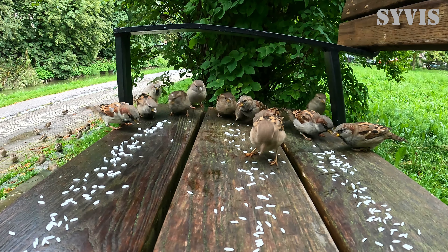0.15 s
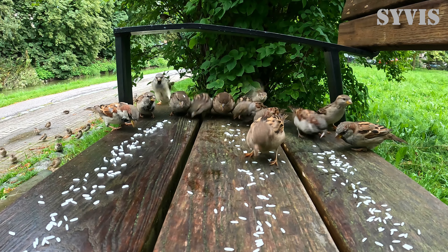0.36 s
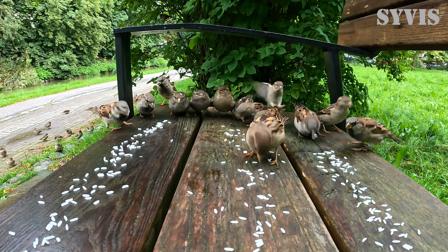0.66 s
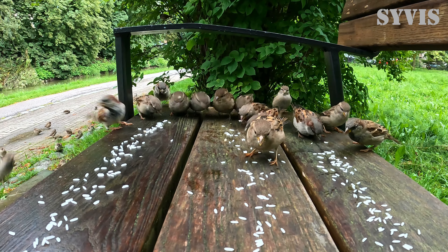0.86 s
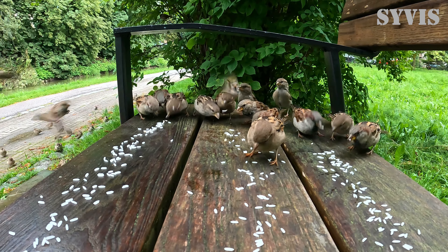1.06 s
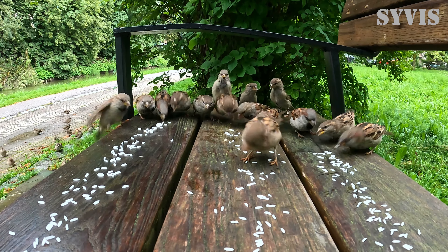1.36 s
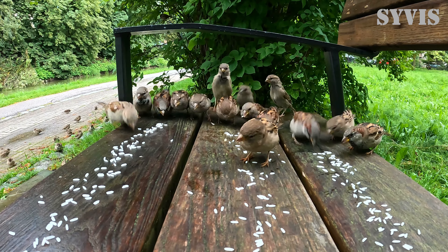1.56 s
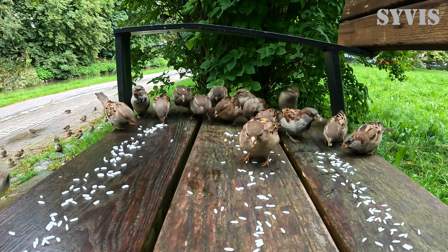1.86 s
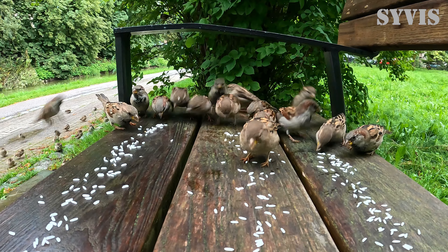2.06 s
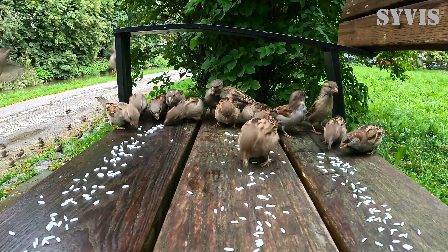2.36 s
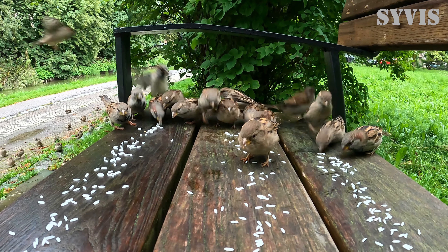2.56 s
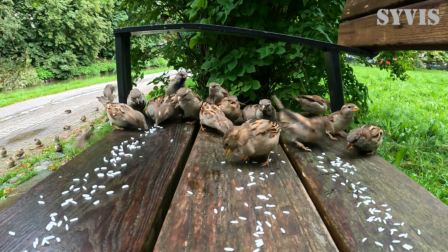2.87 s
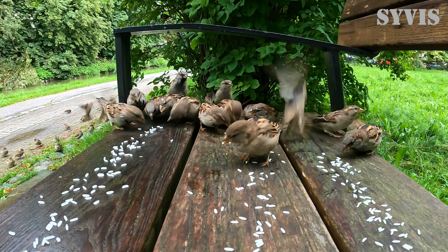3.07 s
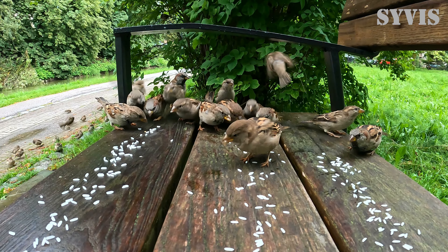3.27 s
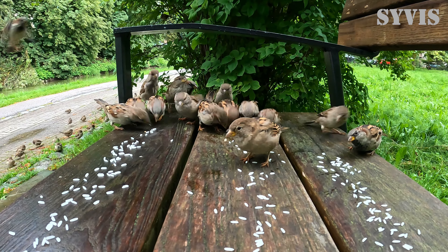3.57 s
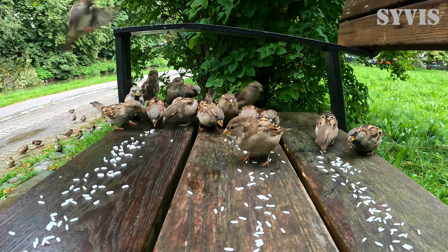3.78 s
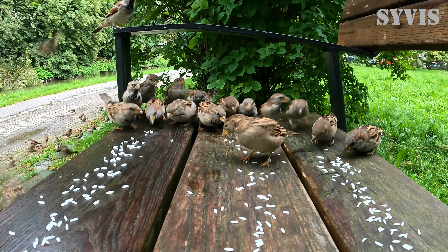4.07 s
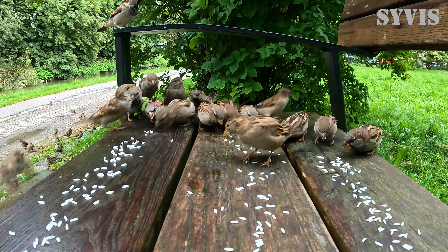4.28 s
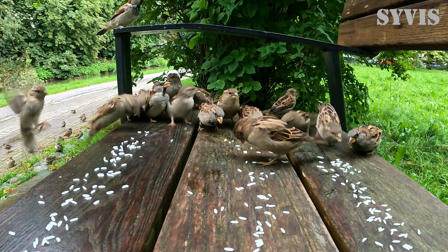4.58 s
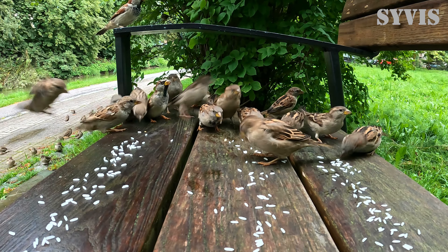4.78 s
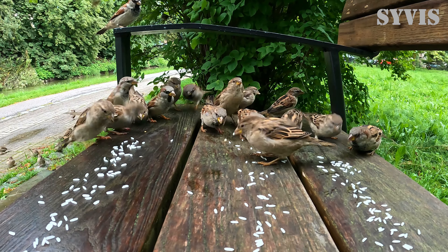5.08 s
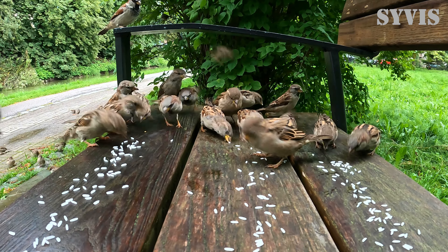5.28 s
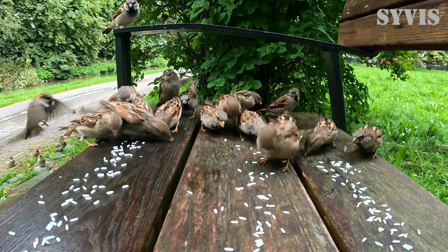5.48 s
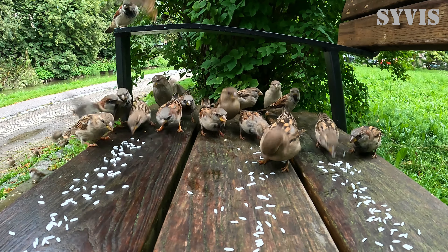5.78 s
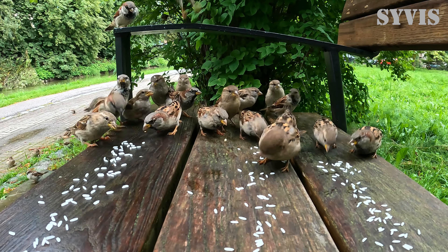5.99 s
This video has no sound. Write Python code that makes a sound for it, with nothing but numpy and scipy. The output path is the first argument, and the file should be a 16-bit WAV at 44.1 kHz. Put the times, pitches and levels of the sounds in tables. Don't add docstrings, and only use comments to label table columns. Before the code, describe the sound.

Sparrows cheep in short raspy bursts and peck at grain on a wooden table, over a loud low rumble of distant traffic.

```python
import sys
import numpy as np
from scipy import signal
from scipy.fft import rfft, irfft
from scipy.io import wavfile
from scipy.ndimage import uniform_filter1d

SR = 44100
rng = np.random.default_rng(int(sys.argv[2]) if len(sys.argv) > 2 else 0)


def unload_audio(sound):
    columns = np.transpose(np.atleast_2d(sound))
    steps = np.round(np.clip(columns, -1, 1) * 32767)
    wavfile.write(sys.argv[1], SR, steps.astype(np.int16))


def volts_from_decibels(level):
    exponent = np.asarray(level, float) / 20
    return 10 ** exponent


N = 270637


def band(x, lo_hz, hi_hz, order=2):
    return signal.sosfilt(signal.butter(order, [lo_hz, hi_hz], "band", fs=SR, output="sos"), x)


def walk(rate):
    hold = int(SR / rate)
    steps = np.repeat(rng.standard_normal(N // hold + 1), hold)
    return 1.306 * uniform_filter1d(uniform_filter1d(steps, hold), hold)[:N]


def curves(table):
    s, *columns = np.transpose(table)
    return [np.interp(np.arange(N) / SR, s, column) for column in columns]


def add(out, t, sound, pan_db):
    first = int(t * SR)
    sound = sound[:N - first].T
    out[:, first:first + sound.shape[-1]] += sound * volts_from_decibels(np.array([[pan_db], [-pan_db]]) / 2)


def chirps():
    # start in seconds, length in seconds, first pitch in Hz, last pitch in Hz, level in dB.
    reedy_notes = [(0.158, 0.043, 4800, 4420, -47.5), (0.194, .035, 4150, 3750, -53),
                   (1.348, .009, 5500, 4750, -32), (1.353, 0.014, 4720, 4920, -23),
                   (1.367, 0.02, 4780, 4330, -35), (1.385, 0.016, 4030, 3680, -39.5),
                   (2.509, 0.03, 4650, 4050, -50), (2.599, 0.024, 4300, 3550, -56),
                   (2.537, 0.018, 3920, 3550, -42), (2.551, 0.0403, 3510, 3090, -43),
                   (2.59, .045, 3050, 2200, -44.5)]
    left_notes = [(.386, 0.059, 5060, 3940, -44.5), (.386, 0.016, 4450, 4130, -49),
                  (.404, .018, 4350, 3930, -42), (.425, .02, 2900, 2600, -61),
                  (.865, 0.02, 2740, 3170, -45.5), (.887, 0.026, 3250, 2830, -44),
                  (.915, 0.013, 3160, 2700, -48), (2.89, .04, 4790, 4070, -45),
                  (2.937, 0.038, 3850, 3200, -42), (2.941, .045, 3500, 2730, -52),
                  (3.643, .017, 6300, 5300, -46.5), (3.658, 0.034, 5200, 4660, -35),
                  (3.693, 0.033, 4710, 3720, -37.5), (3.725, 0.0081, 3800, 3300, -41),
                  (3.732, 0.0078, 3300, 2480, -43), (3.744, 0.01, 3400, 2580, -48),
                  (.88, .03, 3700, 3330, -57), (3.92, 0.049, 5800, 4266, -52.5),
                  (4.856, 0.04, 4660, 4210, -39.5), (4.893, 0.017, 4700, 4200, -38),
                  (5.127, 0.021, 5300, 5410, -47), (5.5, 0.014, 3940, 3895, -56),
                  (5.512, 0.0095, 2890, 2560, -41.5), (5.515, 0.0083, 3360, 3200, -48),
                  (5.965, .025, 6090, 5706, -54), (5.775, 0.0173, 5350, 4680, -41),
                  (5.79, 0.044, 4610, 4250, -41.5)]
    right_notes = [(.305, 0.023, 5800, 5200, -51.5), (1.066, .014, 7300, 7000, -54),
                   (1.073, .008, 6950, 6800, -56), (1.082, 0.022, 5470, 4500, -52),
                   (1.112, .018, 4200, 3700, -48.5), (1.297, 0.024, 8100, 5900, -49),
                   (1.338, .008, 8900, 8300, -48), (1.373, .008, 6900, 6600, -49),
                   (1.31, .02, 12050, 13000, -59), (1.3, 0.015, 10200, 10200, -55),
                   (1.295, 0.024, 5300, 6800, -50), (1.316, 0.02, 6100, 6250, -43),
                   (1.817, .004, 4600, 4950, -42), (1.5, 0.0089, 5150, 5250, -52),
                   (1.829, .015, 5000, 4150, -46), (1.848, 0.027, 3950, 4800, -46),
                   (1.843, 0.015, 5500, 5260, -42), (1.87, 0.0227, 4300, 3500, -44),
                   (1.892, 0.015, 3400, 2750, -45.5), (3.768, .03, 5900, 4630, -45.5),
                   (3.735, .005, 5400, 4300, -43), (3.743, .005, 4900, 4100, -46),
                   (3.75, 0.0043, 4700, 3600, -46), (3.769, 0.0082, 3400, 5000, -40),
                   (4.2, 0.03, 3660, 4700, -48), (5.815, 0.036, 4370, 3300, -47)]
    clear_notes = [(4.848, 0.0099, 5980, 4900, -36.5), (4.858, 0.04, 4970, 4760, -34.5),
                   (1.323, 0.0078, 8800, 7900, -42), (1.332, 0.015, 7850, 7100, -39),
                   (4.893, 0.027, 4250, 3810, -33.5), (4.92, 0.023, 3850, 3470, -39.5),
                   (5.147, 0.034, 5250, 4300, -38), (5.175, 0.026, 4180, 3580, -44),
                   (5.203, 0.035, 3500, 2960, -45), (5.243, .018, 2950, 2700, -55),
                   (5.178, 0.022, 4550, 3920, -43), (5.205, 0.035, 3970, 3510, -47),
                   (.326, 0.037, 4870, 4100, -60), (.347, 0.017, 4400, 3830, -48),
                   (.36, 0.05, 3900, 3230, -44.5), (.362, .03, 3600, 3300, -53),
                   (.403, 0.033, 3250, 3070, -49.5), (1.859, 0.015, 4750, 4290, -39),
                   (1.874, 0.018, 4350, 3600, -40.5), (5.992, 0.058, 5470, 3650, -47.5)]
    # octave overtone in dB, left minus right in dB, rasp of a -30 dB note from 0 to 1.
    voices = [
        (-12, 1, .15),
        (-26, 1, .28),
        (-26, -3, .32),
        (-21, 2, .16),
    ]
    out, fade = np.zeros((2, N)), .004
    waver, tremble, broken = walk(220), walk(300), walk(150)
    spill = band(rng.standard_normal(N), 90, 520)
    spill /= spill.std()
    groups = (reedy_notes, left_notes, right_notes, clear_notes)
    for notes, (octave_db, pan_db, husk) in zip(groups, voices):
        for start, length, hz0, hz1, db in notes:
            t = np.arange(start - fade, start + length + fade, 1 / SR)
            i = (t * SR).astype(int)
            rasp = np.clip(husk + .014 * (-30 - db), .05, .65)
            along = np.clip((t - start) / length, 0, 1)
            glide = hz0 + (hz1 - hz0) * along ** .85
            pitch = glide * (1 + (.004 + .022 * rasp) * waver[i])
            phase = 2 * np.pi * np.cumsum(pitch) / SR
            edge = np.clip(np.minimum(t - t[0], t[-1] - t) / (2 * fade), 0, 1)
            effort_db = np.interp(along, [0, .34, 1], [-1, 0, -2.5])
            third = volts_from_decibels(effort_db - 17) * np.sin(3 * phase)
            overtone_db = octave_db + .3 * effort_db + 4 * broken[i] - 2
            voice = np.sin(phase) + volts_from_decibels(overtone_db) * (np.sin(2 * phase) + third)
            tone = voice * (np.sqrt(1 - rasp ** 2) + rasp * spill[i])
            level = volts_from_decibels(db + effort_db + 2 * tremble[i])
            add(out, t[0], np.sqrt(2) * tone * edge * level, pan_db)
    return out


def tick(width_s, lo_hz, hi_hz):
    t = (np.arange(400) - 130) / SR
    grit = rng.standard_normal(400) * volts_from_decibels(6.4 * np.repeat(rng.standard_normal(20), 20))
    burst = np.exp(-np.abs(t) / (width_s * 1.6 ** rng.uniform(-.86, 1)))
    crack = band(grit * burst, lo_hz, hi_hz, order=3)
    return crack / np.sqrt(2 * uniform_filter1d(crack ** 2, size=40).max())


def pecks():
    # time
    # in seconds, treble in dB, upper middle in dB, middle in dB.
    small_hits = [(0.0141, -37, -39, -32.5), (0.046, -42, -50, -41), (0.1628, -48, -56, -45),
                  (0.2045, -54, -47, -51), (0.3705, -56, -52, -53), (0.5435, -59, -40, -53),
                  (0.684, -37, -39, -30), (0.7122, -53, -65, -48), (0.7628, -48, -54, -49),
                  (0.783, -62, -61, -55), (0.8469, -59, -46, -51), (0.9122, -63, -57, -53),
                  (1.1193, -56, -58, -48), (1.2354, -54, -43, -53), (1.2653, -54, -56, -43),
                  (1.5193, -60, -62, -55), (1.5345, -55, -64, -48), (1.6, -53, -58, -49),
                  (1.7367, -41, -55, -34), (1.9061, -41, -39, -36), (1.9726, -53, -53, -50),
                  (2.0696, -50, -49, -45), (2.1762, -57, -54, -50), (2.3921, -57, -55, -51),
                  (2.51, -54, -49, -53), (2.6519, -58, -58, -53), (2.6748, -51, -48, -48),
                  (2.6859, -44, -51, -42), (2.8959, -59, -57, -53), (2.929, -49, -55, -47),
                  (2.934, -47, -44, -42), (3.0172, -50, -48, -43), (3.034, -44, -47, -37),
                  (3.3246, -48, -52, -37), (3.4404, -56, -60, -50), (4.042, -43, -46, -42.5),
                  (4.1601, -59, -54, -48), (4.2265, -59, -59, -51), (4.349, -56, -46, -48),
                  (4.4129, -56, -56, -41), (4.4569, -53, -48, -35), (4.4751, -38, -44, -35),
                  (4.7267, -48, -48, -35), (4.7816, -49, -62, -37), (4.7912, -48, -45, -45),
                  (5.0682, -60, -65, -53), (5.1363, -42, -39, -40), (5.471, -55, -59, -43),
                  (5.6048, -47, -54, -37), (5.8603, -58, -53, -53),
                  (0.528, -40, -49, -51), (0.5313, -54, -54, -52), (0.5755, -54, -50, -53),
              (0.6556, -47, -43, -53), (0.8058, -43, -46, -42), (1.1778, -49, -41, -53),
              (1.2862, -47, -51, -42), (1.5846, -39, -52, -49), (1.6113, -47, -56, -53),
              (1.805, -45, -49, -48), (1.8732, -41, -46, -53), (1.877, -43, -41, -53),
              (2.015, -52, -56, -51), (2.0762, -52, -55, -53), (2.2524, -51, -43, -50),
              (2.4048, -53, -56, -53), (2.4553, -48, -45, -53), (2.4717, -42, -53, -53),
              (2.7565, -48, -55, -53), (2.7841, -55, -55, -53), (2.8878, -50, -57, -53),
              (2.9991, -48, -55, -48), (3.0494, -55, -64, -53), (3.1156, -52, -53, -53),
              (3.123, -55, -50, -53), (3.3406, -48, -65, -53), (3.4649, -53, -54, -51),
              (3.4883, -42, -49, -40), (3.512, -44, -43, -48), (3.5525, -54, -65, -51),
              (3.7569, -46, -53, -53), (3.81, -50, -65, -53), (3.814, -45, -65, -51),
              (3.862, -45, -50, -50), (3.893, -48, -40, -51), (3.956, -43, -58, -51),
              (4.1079, -48, -58, -53), (4.185, -45, -52, -42), (4.8116, -45, -37, -53),
              (4.9525, -50, -65, -53), (5.0039, -42, -58, -52), (5.1152, -44, -56, -48),
              (5.1673, -43, -46, -53), (5.3553, -43, -56, -37), (5.4275, -54, -65, -56),
              (5.751, -50, -54, -53), (5.8161, -51, -43, -53), (5.8853, -44, -65, -49),
              (6.007, -56, -47, -53), (6.0626, -54, -53, -53),
                  (0.1694, -56, -55, -47), (0.2295, -56, -54, -44), (0.2331, -55, -55, -43),
                 (0.4531, -62, -56, -47), (0.508, -59, -51, -50), (0.6263, -52, -58, -36),
                 (0.7061, -57, -47, -38), (0.73, -37, -42, -27.5), (0.7519, -59, -56, -42),
                 (0.972, -54, -56, -42), (1.095, -62, -53, -52), (1.1281, -49, -59, -42),
                 (1.2543, -46, -52, -31.5), (1.556, -50, -51, -31), (1.6624, -70, -59, -38.5),
                 (1.9524, -57, -51, -42), (2.3079, -54, -65, -46), (2.325, -69, -46, -43),
                 (2.3794, -66, -57, -44), (2.478, -48, -46, -36), (2.707, -46, -43, -37),
                 (2.7107, -46, -50, -33), (2.9147, -58, -42, -38), (3.0587, -66, -53, -53),
                 (3.3129, -55, -52, -47), (3.5427, -63, -47, -51), (4.121, -57, -58, -42),
                 (4.1658, -59, -45, -39), (4.2875, -60, -57, -38), (4.2935, -48, -46, -33.5),
                 (4.3178, -61, -56, -39), (4.379, -55, -63, -37), (4.6023, -57, -44, -34),
                 (4.6418, -54, -50, -31), (4.7574, -52, -48, -38), (4.7617, -35, -37, -20),
                 (4.9211, -39, -32, -27), (5.1406, -66, -45, -53), (5.2719, -56, -57, -47),
                 (5.5196, -61, -55, -35), (5.5557, -46, -44, -33), (5.6762, -52, -42, -38),
                 (5.7072, -50, -65, -37), (5.8049, -48, -42, -34), (6.0311, -49, -38, -34),
                 (6.0696, -54, -49, -42),
                  (4.8835, -60, -56, -35),
        (4.5, -50, -36, -42),
        (4.6, -60, -48, -44),
        (4.7, -47, -42, -44),
    ]
    out, lead = np.zeros((2, N)), 136 / SR
    for t, treble_db, upper_db, mid_db in small_hits:
        shared, own = tick(.0004, 8600, 13800), tick(.0004, 9500, 15000)
        treble = shared + .53 * own * np.array([[1], [-1]])
        pan_db = 4.8 * rng.standard_normal()
        add(out, t - lead, volts_from_decibels(treble_db - 1.5) * treble.T, 2.2)
        add(out, t - lead, volts_from_decibels(upper_db - .8) * tick(.00034, 5500, 8600), pan_db)
        add(out, t - lead, volts_from_decibels(mid_db - 1.5) * tick(.00068, 1800, 5060), pan_db)
    for when, size, colour, side in rng.random((900, 4)):
        db = min(-3 * np.log(size), 6) - 62
        lo_hz = 3000 * 3 ** colour
        add(out, when * (N - 400) / SR, volts_from_decibels(db) * tick(.00043, lo_hz, 1.5 * lo_hz), 22 * (side - .35))
    return out


def knocks():
    # time in seconds, peak in dB, ring pitch in Hz.
    landings = [(0.438, -35, 370), (0.659, -47, 520), (1.143, -34, 438), (1.873, -37, 369.5),
                (2.216, -37, 539), (2.391, -39, 544), (2.738, -39, 444), (2.927, -24, 425),
                (3.121, -34.5, 350), (3.321, -36, 507), (3.836, -35, 509), (4.343, -39, 363),
                (4.723, -36.5, 363.2), (5.126, -26, 506.3), (5.808, -34.5, 420.5)]
    out, t = np.zeros((2, N)), np.arange(4000) / SR
    for when, db, hz in landings:
        main_t60 = min(.085, .08 * (425 / hz) ** 3.55)
        ring = 0
        for ratio, mode_db, t60 in ((1, 3.5, main_t60), (1.45, -8, .047), (2.4, .5, .022)):
            ring = ring + volts_from_decibels(mode_db) * np.sin(2 * np.pi * ratio * hz * t) * 1000 ** (-t / t60)
        add(out, when, volts_from_decibels(db) * ring * (1 - np.exp(-t / .0003)), 0)
    return out


def chatter():
    # start in seconds, end in seconds, first Hz, last Hz, level in dB.
    far_whistles = [
        (.42, .72, 4710, 4620, -60.5),
        (.68, .9, 4680, 4400, -65),
        (.79, .95, 5050, 5000, -62.5),
        (3.21, 3.67, 4470, 4490, -63.5),
    ]
    # start in seconds, end in
    # seconds, centre in Hz, width in Hz, level in dB.
    squabbles = [
        (1.292, 1.37, 7000, 2400, -46),
        (3.73, 3.805, 3800, 3000, -47.5),
        (3.768, 3.826, 1900, 730, -48),
        (5.16, 5.168, 2574, 410, -43),
        (4.56, 4.72, 6800, 6500, -56),
        (0.31, 0.44, 3900, 1400, -58),
        (1.84, 1.9, 4300, 2200, -51),
        (2.911, 2.919, 6800, 1100, -47),
    ]
    out = np.zeros((2, N))
    for start, end, hz0, hz1, db in far_whistles:
        n = int((end - start) * SR)
        pitch = np.linspace(hz0, hz1, n) * (1 + .011 * walk(160)[:n])
        whistle = np.sin(2 * np.pi * np.cumsum(pitch) / SR) * signal.windows.tukey(n, .3)
        add(out, start, np.sqrt(2) * whistle * volts_from_decibels(db + 1 + 2 * walk(160)[:n]), 0)
    for start, end, hz, width_hz, db in squabbles:
        n = int((end - start) * SR)
        hoarse = band(rng.standard_normal(n), hz - width_hz / 2, hz + width_hz / 2)
        hoarse = hoarse * volts_from_decibels(3 * walk(400)[:n])
        add(out, start, hoarse / hoarse.std() * signal.windows.tukey(n, .6) * volts_from_decibels(db), 0)
    return out


def echo(x, t60):
    t = np.arange(int(.15 * SR)) / SR
    tail = rng.standard_normal((2, len(t))) * np.exp(-np.log(1000) * t / t60) * (t > .002)
    return signal.fftconvolve(x, tail / np.sqrt(np.sum(tail ** 2) / 2), axes=1)[:, :N]


def drone(table, waver, beat_db):
    hz, db = curves(table)
    phase = 2 * np.pi * np.cumsum(hz * (1 + waver * walk(12))) / SR
    drift = .031 * walk(4.83) * np.array([[1], [-1]])
    return np.sqrt(2) * np.sin(phase + drift) * volts_from_decibels(db + beat_db * walk(14))


def engines():
    # time in seconds, pitch in Hz, level in dB.
    low_hum = [(0, 50.6, -26.5), (.6, 50.56, -33), (1.02, 49.28, -21.5), (1.63, 49.34, -23),
               (1.84, 47.06, -31.5), (2.04, 49.6, -28), (2.45, 50.6, -20.5), (2.65, 51.3, -46),
               (2.86, 44.3, -19), (3.26, 44.6, -17), (3.47, 44.9, -22), (3.67, 44.4, -26.5),
               (3.88, 47.3, -21), (4.08, 49.87, -28), (4.49, 44.05, -45), (4.9, 49.84, -20.5),
               (5.2, 48.46, -31), (6.14, 52, -23)]
    high_hum = [(0, 132.3, -29.5), (.34, 130.4, -45), (.68, 114.2, -35.5), (1.36, 125.7, -29.5),
                (1.7, 127.6, -37.5), (2.04, 124.1, -28), (2.38, 133, -32), (3.4, 131.5, -35),
                (4.08, 128.4, -25.5), (4.42, 129.5, -28.5), (5.1, 131.6, -34), (5.44, 133.2, -29),
                (6.14, 132.5, -34)]
    return drone(low_hum, .0492, 3.08) + drone(high_hum, .0198, 1.7)


def traffic():
    # time in seconds, level in dB.
    swell = [
        (0, -.3),
        (2.7, .1),
        (3.3, -.4),
        (4.3, -.5),
        (4.75, 1.3),
        (5.3, .5),
        (6.14, .6),
    ]
    # pitch in Hz, level in dB per Hz.
    road_tone = [(22, -2.5), (53, 1.5), (93, -6), (150, -8), (202, -16), (353, -29.5), (780, -33.5),
                 (980, -26.5), (2650, -45.5), (3400, -46.5), (7300, -56.5), (8500, -66), (10800, -60),
                 (14500, -77)]
    # pitch in Hz, side minus middle in dB.
    spread = [(30, -10), (130, -23.5), (500, -12), (1000, -11.5), (2000, -6.5), (6000, -7.5), (13000, -6.5)]
    # pitch in Hz, lead in radians.
    port_phase = [(30, -0.092), (300, -0.071), (1000, -.25), (2410, -0.51), (4910, -0.35), (7670, -.2),
                  (12000, .1)]
    swell_db, = curves(swell)
    freq = np.log(np.maximum(np.arange(N // 2 + 1) * SR / N, 1))

    def by_pitch(table):
        hz, values = np.transpose(table)
        return np.interp(freq, np.log(hz), values)

    mid, side = rfft(rng.standard_normal((2, N))) * volts_from_decibels(by_pitch(road_tone)) * (freq > np.log(16))
    lead = np.clip(by_pitch(port_phase), -1, 1)
    side = side * volts_from_decibels(by_pitch(spread)) + 1j * np.tan(lead / 2) * mid
    scale = volts_from_decibels(-22.5) / np.std(irfft(mid, N))
    out, step = 0, np.log(2) / 2
    ruffle = .6 * walk(25) + walk(90)
    for octave in np.arange(3.5, 14.6, .5):
        share = np.clip(1 - np.abs(freq - octave * np.log(2)) / step, 0, 1)
        m, s = irfft(np.array([mid, side]) * share, N)
        db = swell_db + 1.3 * np.clip(octave - 11.3, 0, 1.7) * ruffle + .9 * walk(6)
        out = out + volts_from_decibels(db) * np.array([m + s, m - s])
    return scale * out


def scene():
    calls, ticks = chirps() + chatter(), pecks()
    echoes = volts_from_decibels(-7.5) * echo(calls, .05) + volts_from_decibels(-19) * echo(ticks, .02)
    return calls + ticks + knocks() + echoes + engines() + traffic()


def roll_off(x):
    return signal.sosfilt(signal.butter(12, 15740, fs=SR, output="sos"), x)


def record(dry):
    heard = signal.sosfilt(signal.butter(4, 13500, fs=SR, output="sos"), dry)
    return roll_off(heard)


dry = scene()
out = record(dry)
unload_audio(out)
```